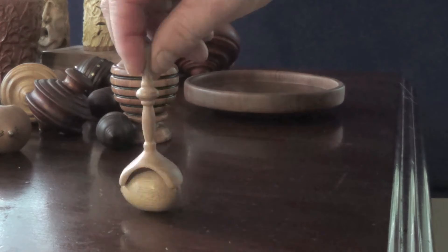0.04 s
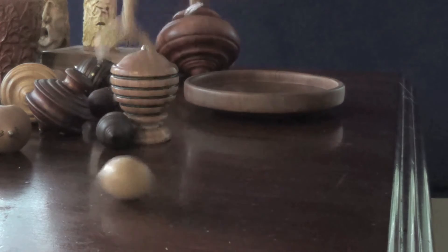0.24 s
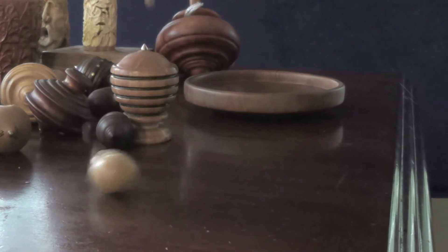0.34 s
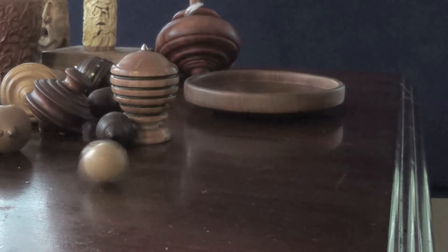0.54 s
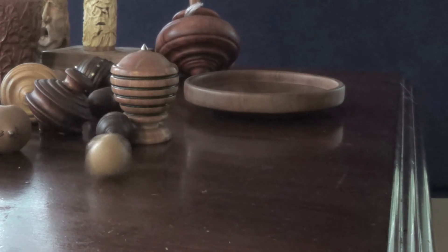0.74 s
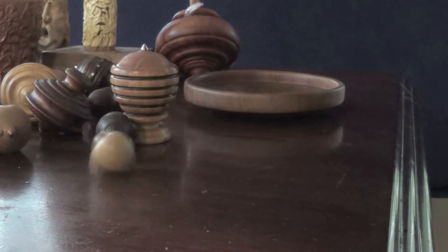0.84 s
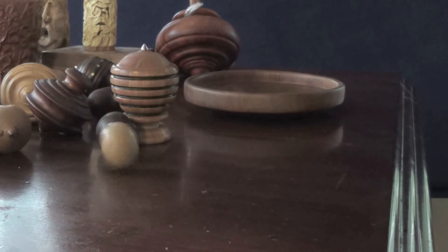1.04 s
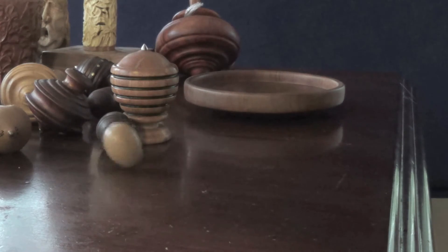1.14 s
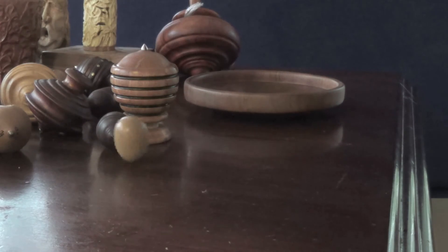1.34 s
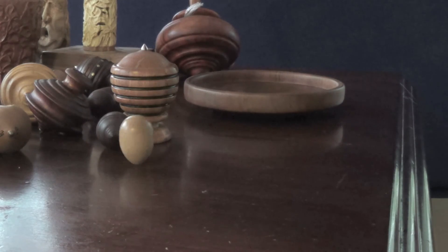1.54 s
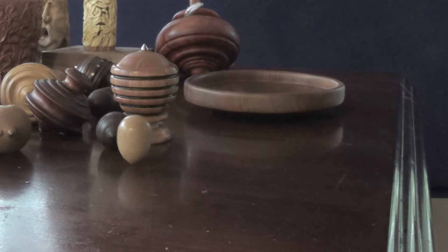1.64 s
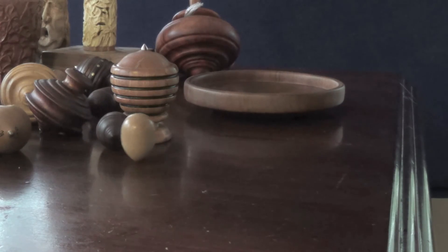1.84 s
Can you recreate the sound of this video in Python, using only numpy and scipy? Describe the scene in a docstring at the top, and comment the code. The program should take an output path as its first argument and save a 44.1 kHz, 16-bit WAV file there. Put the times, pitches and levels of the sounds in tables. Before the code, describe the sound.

A wooden egg spins on a polished wooden table with a fast, uneven rattle over a low rumble. It gives a few sharper ticks and harder knocks, then fades quickly. Heard close by in a small room.

```python
"""Wooden egg spun on a table

Fingers flick a wooden egg into a spin on a polished wooden table in a small room.
It rumbles along on its side; each touch-down chatters and rings the table top.
It skips hardest as it rears up, with sharp ticks and low thuds, then settles on its tip
and falls silent. A faint hum and hiss lie underneath."""
import sys
import numpy as np
from scipy import signal
from scipy.fft import rfft, irfft, next_fast_len
from scipy.io import wavfile
from scipy.ndimage import map_coordinates

SR = 44100
rng = np.random.default_rng(int(sys.argv[2]) if len(sys.argv) > 2 else 0)


def to_wav(s):
    """Save 16-bit WAV."""
    ch = np.atleast_2d(s).T  # columns
    pcm = np.round(np.clip(ch, -1, 1) * 32767)  # PCM
    wavfile.write(sys.argv[1], SR, pcm.astype(np.int16))


N = 83790


def amp(db):
    """Decibels to gain."""
    return 10 ** (np.asarray(db) / 20)


def unit_rms(x):
    """Scale to rms 1."""
    return x / np.sqrt(np.mean(x ** 2) + 1e-20)


def at_hz(points, hz):
    """Interpolate (f/Hz, value) points on a log axis."""
    knots_hz, values = np.transpose(points)
    return np.interp(np.log(hz + 1), np.log(knots_hz + 1), values)


def curve(points):
    """Interpolate (t/s, value) points at every sample."""
    return np.interp(np.arange(N) / SR, *np.transpose(points))


def wobble(rate_hz):
    """Smooth random curve, rate_hz knots a second."""
    knots = rng.standard_normal(int(N * rate_hz / SR) + 4)
    return map_coordinates(knots, [np.arange(N) * rate_hz / SR])


def convolved(x, impulse):
    """Convolve, keeping the length of x."""
    return signal.fftconvolve(x, impulse, axes=1)[:, :x.shape[1]]


def coloured(x, gain_db, size=4096):
    """Minimum-phase filter with gain gain_db(hz)."""
    cepstrum = irfft(np.log(amp(gain_db(np.fft.rfftfreq(size, 1 / SR)))))
    cepstrum[1:size // 2] *= 2
    cepstrum[size // 2 + 1:] = 0
    return convolved(x, irfft(np.exp(rfft(cepstrum)))[None])


def filtered(x, response):
    """Apply the complex gain response(hz)."""
    size = next_fast_len(N + SR // 2)
    return irfft(rfft(x, size) * response(np.fft.rfftfreq(size, 1 / SR)), size)[:, :N]


def add(track, start_s, sound):
    """Mix a sound into a track."""
    part = track[:, round(start_s * SR):][:, :sound.shape[1]]
    part += sound[:, :part.shape[1]]


# Diffuse-field width: f/Hz, side over mid/dB
STEREO_WIDTH = [(60, -23), (380, -2.5), (700, -16.5), (1300, -14), (2400, -10), (5000, -9), (8000, -34),
                (15000, -56)]


def diffuse(count):
    """Near-white stereo noise whose width varies with frequency."""
    mid, side = rng.standard_normal((2, 1, count))
    side = coloured(side, lambda hz: at_hz(STEREO_WIDTH, hz))
    return unit_rms(np.vstack([mid + side, mid - side]))


def noise(count, spectrum):
    """Diffuse noise at rms 1, shaped by (f/Hz, level/dB) points."""
    return unit_rms(coloured(diffuse(count), lambda hz: at_hz(spectrum, hz)))


# Room decay: f/Hz, T60/s
ROOM_DECAY = [(150, 1), (1000, 0.9), (3000, 0.49), (6000, 0.9), (10000, 0.99), (16000, 0.14)]


def in_room(x, wet_db):
    """Add the room's tail; each frequency dies at its own rate."""
    hz, t, bins = signal.stft(diffuse(SR // 2), SR, nperseg=256)
    decay = amp(-60 * t / at_hz(ROOM_DECAY, hz)[:, None]) * (t > 0)
    tail = signal.istft(bins * decay, SR, nperseg=256)[1]
    return x + amp(wet_db) * convolved(x, tail / np.linalg.norm(tail[0]))


# Hum tones, before the background gain: f/Hz, level/dB
HUM_TONES = [(59, -66), (592, -57.5), (650, -49.5), (15735, -76)]
# Room noise spectrum: f/Hz, level/dB
HISS_SPECTRUM = [(25, -18), (100, -3), (200, 5.5), (300, 7.5), (500, 6), (700, -1.5), (1100, -6.5),
                 (2000, -9.5), (4000, -14), (8000, -15.5), (12000, -18), (15000, -21)]
# Gain on hum and hiss: t/s, gain/dB
BACKGROUND_GAIN = [(.04, 3), (.09, -0.5), (.135, -9.5), (.16, -38), (.18, 5.5)]


def background(waver_db=1.8, hiss_db=-55.5):
    """Wavering hum and room noise; the level dips briefly before the flick."""
    t = np.arange(N) / SR
    hum = np.zeros(N)
    for hz, db in HUM_TONES:
        peak = np.sqrt(2) * amp(db + waver_db * wobble(rate_hz=25.5))
        hum += peak * np.sin(2 * np.pi * (hz * t + rng.random()))
    hiss = amp(hiss_db) * noise(N, HISS_SPECTRUM)
    return (hum + hiss) * amp(curve(BACKGROUND_GAIN))


# Rumble envelope: t/s, level/dB
ROLL_LEVEL = [(.17, -90), (.19, -49.5), (.3, -39.5), (.8, -39), (1.1, -37), (1.3, -35), (1.45, -39.5),
              (1.6, -41), (1.73, -41.5), (1.79, -53), (1.9, -76)]
# Rumble spectrum: f/Hz, level/dB
ROLL_SPECTRUM = [(40, -26), (120, -17), (210, -2.5), (500, 2.5), (1100, -7), (1800, -23.5), (3000, -28.5),
                 (6000, -50.5), (16000, -70)]


def rolling(flutter_db=0.95):
    """The egg rumbles over the grain of the wood."""
    return noise(N, ROLL_SPECTRUM) * amp(curve(ROLL_LEVEL) + flutter_db * wobble(rate_hz=60))


# Fingertip slips: t/s, level/dB, T60/s
SLIPS = [(0.177, -40, 0.023), (0.183, -33, 0.015), (.185, -30, 0.093), (0.19, -24, 0.0092),
         (0.2043, -26, 0.02)]
# Slip spectrum: f/Hz, level/dB
SLIP_SPECTRUM = [(300, -35), (1000, 12), (2800, -13.5), (4300, -15), (5500, -2.5), (7800, -11.5),
                 (10500, -2.5), (13000, -14), (16000, -33)]


def flick():
    """Fingertips slip over the wood as they set the egg going."""
    track, t = np.zeros((2, N)), np.arange(SR // 10) / SR
    for start_s, db, t60_s in SLIPS:
        add(track, start_s, noise(len(t), SLIP_SPECTRUM) * amp(db - 60 * t / t60_s))
    return in_room(track, wet_db=-3.5)


# Finger releases: t/s, level/dB, f/Hz
FINGER_SNAPS = [(0.1819, -15, 5450), (0.1915, -35, 4080), (0.206, -22, 4700)]


def snaps(t60_s=0.003):
    """Short pitched cracks as the fingers snap off the egg."""
    track, t = np.zeros((2, N)), np.arange(SR // 50) / SR
    for start_s, db, hz in FINGER_SNAPS:
        crack = amp(db - 60 * t / t60_s) * np.sin(2 * np.pi * hz * t)
        add(track, start_s, crack[None])
    return in_room(track, wet_db=-8)


# Table-top modes: f/Hz, level/dB, T60/s
TABLE_MODES = [(227, -7.5, 0.24), (369, 0, 0.041), (609, 0, .1), (679.8, 1, 0.15), (971, -1.5, 0.21),
               (1024.7, -5, 0.32), (1194, 0.5, 0.13), (1306, 4, 0.2), (1427.5, 8.5, .12), (1625, 4, 0.04),
               (1769, 4, 0.16), (2012, -4.5, 0.083), (2126, -3, 0.068), (2500, -29, 0.089),
               (2580, -7.5, 0.15), (2570, -11, 0.16), (2860, -22, 0.13), (3530, -18, 0.03),
               (3733, -22, .05)]


def table_ring(t, scatter_db=1, attack_s=0.00059):
    """The table's modes ring, in a slightly different mix at every spot."""
    ring = np.zeros((1, len(t)))
    for k, (hz, db, t60_s) in enumerate(TABLE_MODES):
        envelope = amp(db + scatter_db * rng.standard_normal() - 60 * t / t60_s)
        ring += (-1) ** k * envelope * np.sin(2 * np.pi * hz * t)
    return unit_rms(ring) * (1 - np.exp(-t / attack_s))


# Spectrum of one contact's thump: f/Hz, level/dB
THUMP_SPECTRUM = [(40, -36), (120, -26.5), (210, -8.5), (500, -10.5), (800, 0.5), (1300, 3.5), (2000, -0.5),
                  (2900, -16), (3800, -26.5), (4800, -40), (6000, -44), (8000, -49), (11000, -57),
                  (15000, -66)]
# Reflections off nearby surfaces: delay/s, level/dB
NEAR_ECHOES = [(.0024, -16.5), (.0041, -8.5), (.0058, -10.5)]


def table_response(t, board_db=-2, board_t60_s=0.064, board_attack_s=0.0021, thump_db=1, ring_db=-31):
    """One contact gives a thump with near echoes, a short dense ring of the boards, and the modes."""
    boards = diffuse(len(t)) * amp(-60 * t / board_t60_s) * (1 - np.exp(-t / board_attack_s))
    boards *= amp(board_db) / np.linalg.norm(boards.mean(0))
    push = (t == 0)[None] * 1.
    echoes = sum(amp(db) * (np.arange(len(t)) == round(delay_s * SR)) for delay_s, db in NEAR_ECHOES)
    colour = lambda hz: at_hz(THUMP_SPECTRUM, hz)
    thump = coloured(push + echoes + boards, colour) / abs(coloured(push, colour)).max()
    return amp(thump_db) * thump + amp(ring_db) * table_ring(t)


def chatter(t, hold_s, count=18, gap_s=0.0045, release_s=0.0038, bounce_db=-3.5, scatter_db=2):
    """One firm contact, then small uneven bounces that hold and die away."""
    times_s = np.cumsum(gap_s * (.6 + .8 * rng.random(count)))
    sizes = amp(bounce_db + scatter_db * rng.standard_normal(count))
    sizes *= np.exp(-np.maximum(times_s - hold_s, 0) / release_s)
    bounces = np.bincount((times_s * SR).astype(int), sizes, len(t))[:len(t)]
    return (t == 0) + bounces


# Egg touch-downs: t/s, level/dB, chatter hold/s, hardness as treble tilt/(dB/octave)
TOUCH_DOWNS = [(.240, -22, 0.0033, 0.5), (.246, -10, 0.0049, -15), (.273, -14.5, 0.0023, -0.5),
               (.2775, -11.5, .004, -12), (.305, -10, 0.0081, -9), (.3195, -10, 0.0025, -4),
               (.336, -12, 0.027, -7.5), (.3722, -12, 0.0042, 2), (.413, -11.5, .005, -2.5),
               (.445, -17, 0.011, -17), (.465, -12.5, 0.0015, -5), (0.4866, -9, 0.012, -3),
               (.520, -15.5, 0.0057, -4), (0.5298, -8, 0.012, -2), (.565, -11, 0.016, -7),
               (0.5808, -14, 0.0038, -0.5), (.599, -14, 0.019, -2.5), (.642, -20, 0.0056, 3),
               (0.6473, -14, .002, 5), (.651, -11.5, 0.0063, 0), (0.677, -10, 0.017, -7),
               (.723, -9, 0.022, -6.5), (.755, -15, 0.0093, -5), (.779, -8.5, 0.0071, -8),
               (0.801, -16, 0.0036, 4), (0.806, -14, 0.025, -1.5), (.826, -18, 0.0011, 4),
               (.832, -15.5, 0.02, -2.5), (.877, -13.5, 0.019, -6.5), (0.9108, -12.5, .004, 5),
               (.915, -13, 0.0255, 2), (0.9654, -7.5, 0.0025, -1.5), (0.976, -7.5, 0.016, -3),
               (1.0227, -15.5, 0.00067, 9.5), (1.028, -10, 0.0074, 1.5), (1.0786, -11.5, 0.0087, 3.5),
               (1.096, -16, 0.015, -1.5), (1.146, -12.5, 0.0065, 11.5), (1.1561, -9.5, 0.024, 6.5),
               (1.2145, -14, 0.0041, 9), (1.2242, -12, 0.015, 10), (1.254, -38.5, 0.018, 25),
               (1.2899, -11.5, 0.0094, 8.5), (1.3043, -7.5, 0.015, 3), (1.320, -12, .008, 1.5),
               (1.362, -8.5, 0.0045, -9.5), (1.374, -9.5, 0.0017, -3.5), (1.394, -16.5, 0.059, -7),
               (1.4372, -6.5, 0.0019, -9.5), (1.451, -12.5, 0.0013, -5.5), (1.4583, -6, 0.014, -7.5),
               (1.4761, -7.5, 0.0037, -4), (1.5389, -9.5, 0.00093, -5.5), (1.554, -8.5, 0.0045, -27),
               (1.579, -13, 0.0035, -8.5), (1.597, -8, 0.0064, -31.5), (1.636, -19.5, 0.0034, -17),
               (1.657, -10, 0.0018, -31), (1.677, -32, .003, -17), (1.695, -37, 0.0033, -7),
               (1.715, -26, .005, -8.5), (1.727, -32, 0.0044, -19)]


def knocks(pivot_hz=1300, tilt_span_octaves=1.19, flick_s=0.183, flick_db=-53):
    """The flick rings the table, then each touch-down chatters on it; harder contacts are brighter."""
    track, t = np.zeros((2, N)), np.arange(SR // 4) / SR
    octaves_up = lambda hz: np.minimum(np.log2(1 + (hz / pivot_hz) ** 2) / 2, tilt_span_octaves)
    for start_s, db, hold_s, hardness in TOUCH_DOWNS:
        contacts, response = chatter(t, hold_s), table_response(t)
        blow = convolved(contacts[None], response)
        # the contacts add in energy
        blow *= np.linalg.norm(contacts) * np.linalg.norm(response) / np.linalg.norm(blow)
        blow = coloured(blow, lambda hz: hardness * octaves_up(hz))
        add(track, start_s, amp(db) * blow)
    add(track, flick_s, amp(flick_db) * table_ring(t))
    return in_room(track, wet_db=-12)


# Hard-spot strikes: t/s, peak level/dB
HARD_STRIKES = [(0.3735, -31), (1.0266, -52), (1.148, -22.5), (1.216, -31), (1.2254, -21.5), (1.2362, -28),
                (1.29, -47), (1.4378, -33), (1.4608, -33)]
# Tick spectrum: f/Hz, level/dB
TICK_SPECTRUM = [(1500, -12), (3600, 11.5), (4800, -7), (6000, -3), (8000, -17), (11000, -12), (15000, -42)]


def ticks(t60_s=0.0048):
    """Tiny bright clicks where the egg's hardest spots strike."""
    track, t = np.zeros((2, N)), np.arange(SR // 50) / SR
    for start_s, db in HARD_STRIKES:
        burst = diffuse(len(t)) * amp(-60 * t / t60_s)
        click = coloured(burst, lambda hz: at_hz(TICK_SPECTRUM, hz))
        add(track, start_s, amp(db) * click / abs(click).max())
    return in_room(track, wet_db=-9.5)


# Heavy landings: t/s, level/dB
LANDINGS = [(1.149, -44), (1.215, -55), (1.31, -59), (1.46, -40.5)]


def thuds(hz=116.6, t60_s=0.21, attack_s=0.005):
    """Heavy landings shake the whole table in one low, dull note."""
    track, t = np.zeros((2, N)), np.arange(SR // 4) / SR
    envelope = amp(-60 * t / t60_s) * (1 - np.exp(-t / attack_s))
    thud = envelope * np.sin(2 * np.pi * hz * t)
    for start_s, db in LANDINGS:
        add(track, start_s, amp(db) * thud[None])
    return track


# Dips in the table's radiation: f/Hz, width/Hz, gain/dB
RADIATION_DIPS = [(306, 71, -2.5), (507, 11.7, -7.5), (807, 17, -9.5), (882, 12.5, -8.5), (1398, 39, -12.5),
                  (1672, 21, -11), (2070, 26, -4.5), (2386, 57, -3), (2610, 65, 0), (3330, 130, -3)]


def radiated(x):
    """The table radiates poorly between its modes."""
    return coloured(x, lambda hz: sum(db * np.exp(-((hz - centre_hz) / width_hz) ** 2)
                                      for centre_hz, width_hz, db in RADIATION_DIPS))


# Stereo balance: f/Hz, left over right/dB
LEFT_BALANCE = [(60, 2), (200, 1), (420, 6.5), (700, 2), (930, -2), (1200, 2.5), (1550, 4.5), (2100, -0.7),
                (4400, 0.7), (8000, 0)]
# Stereo phase: f/Hz, left lead/rad
LEFT_LEAD = [(60, 0.41), (200, 0.054), (430, 0), (560, 0.38), (850, 0.27), (1050, 0.88), (1300, 0.29),
             (1700, 0.25), (2300, 0)]


def placed_left(x):
    """Sound from a little to the left: that side is mostly louder and leads in the low notes."""
    side = np.array([[.5], [-.5]])
    gain = lambda hz: amp(side * at_hz(LEFT_BALANCE, hz))
    return filtered(x, lambda hz: gain(hz) * np.exp(1j * side * at_hz(LEFT_LEAD, hz)))


def scene():
    """Table and background sit slightly left; ticks and finger sounds are centred."""
    table = radiated(knocks() + rolling()) + thuds()
    return placed_left(table + background()) + ticks() + flick() + snaps()


def record(dry):
    """Round off peaks near full scale, then limit the band."""
    top_hz = 16000
    rounded = dry / (1 + abs(dry) ** 6) ** (1 / 6)
    return filtered(rounded, lambda hz: hz < top_hz)


dry = scene()
out = record(dry)
to_wav(out)
```